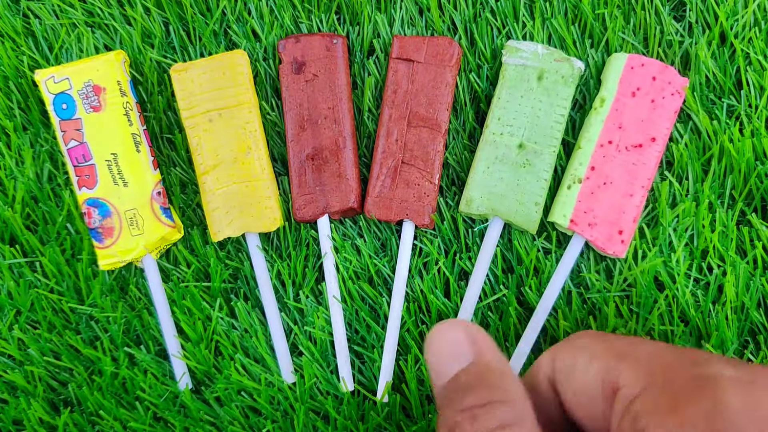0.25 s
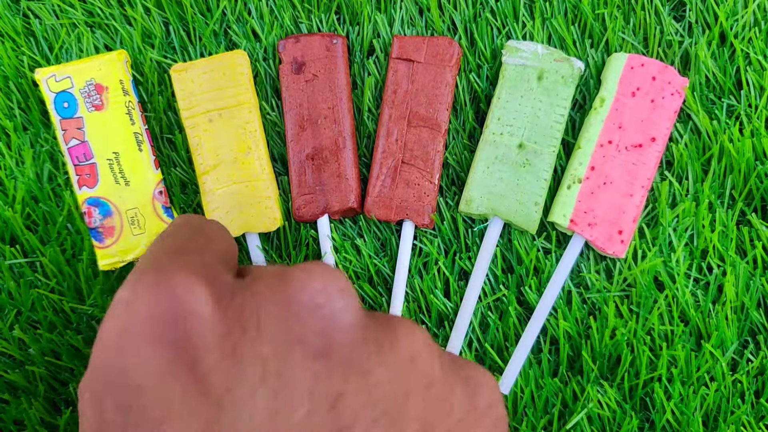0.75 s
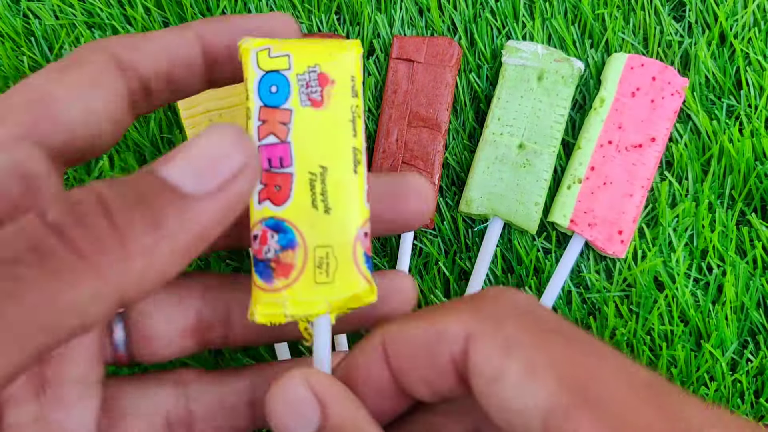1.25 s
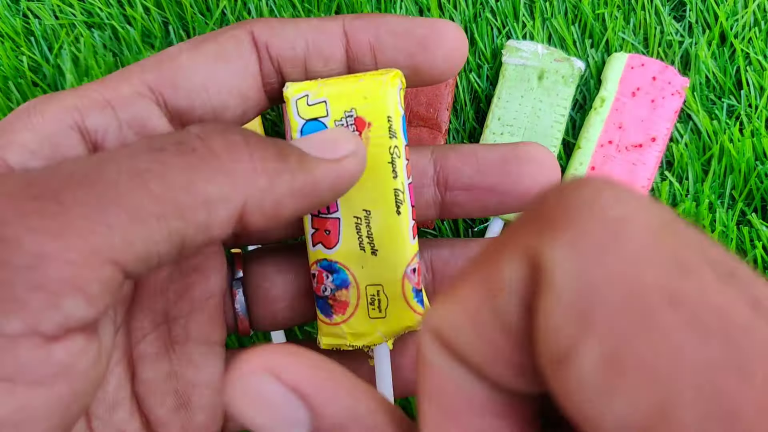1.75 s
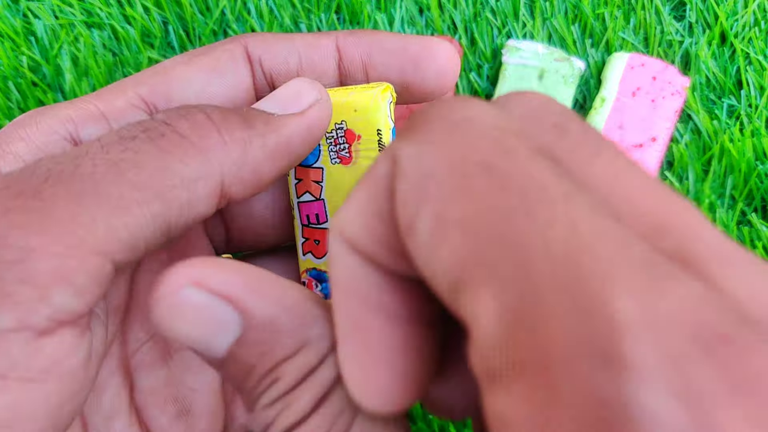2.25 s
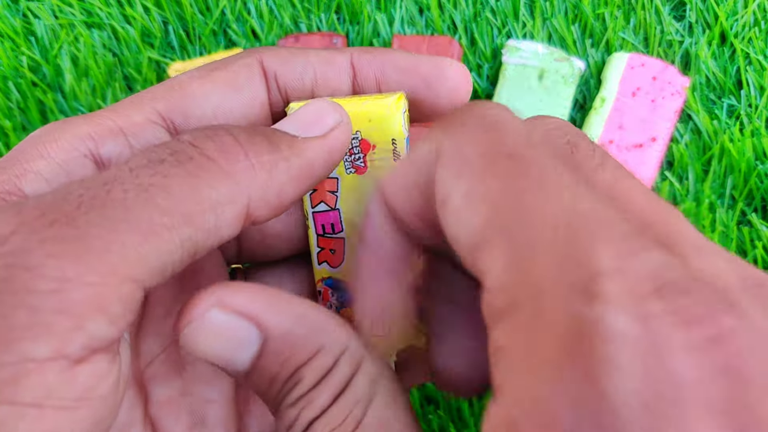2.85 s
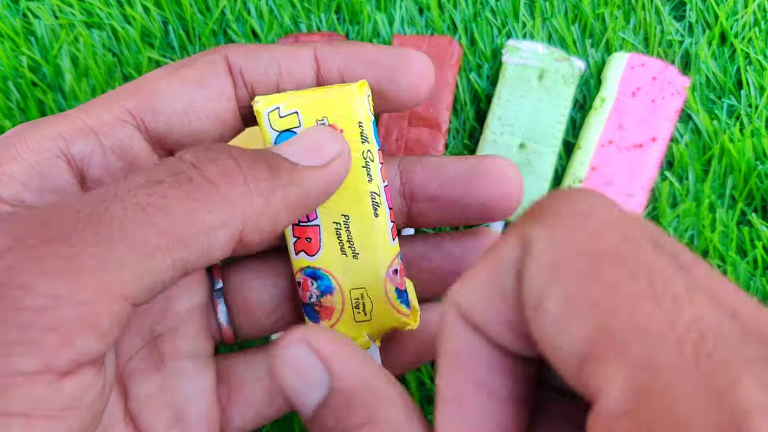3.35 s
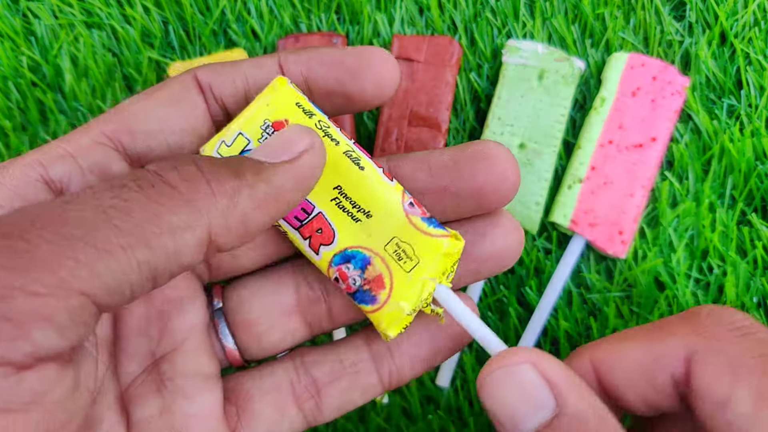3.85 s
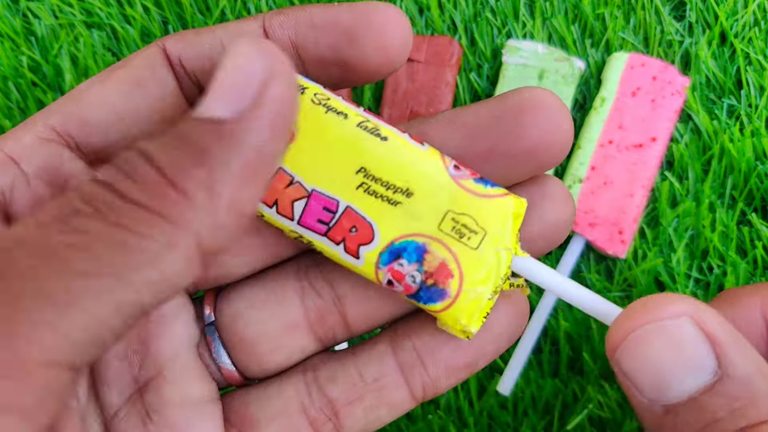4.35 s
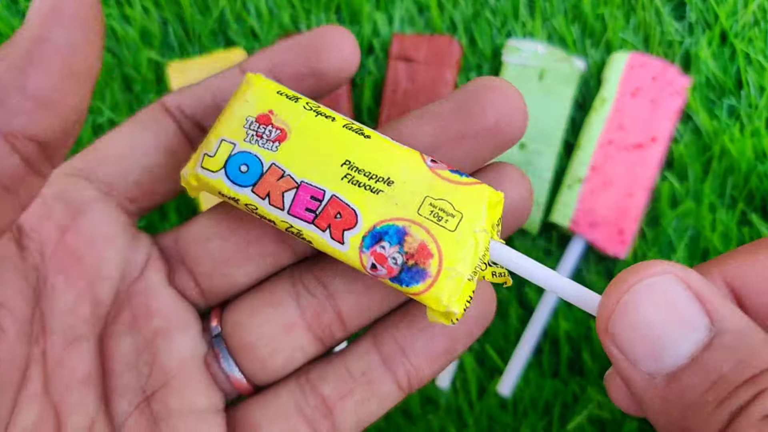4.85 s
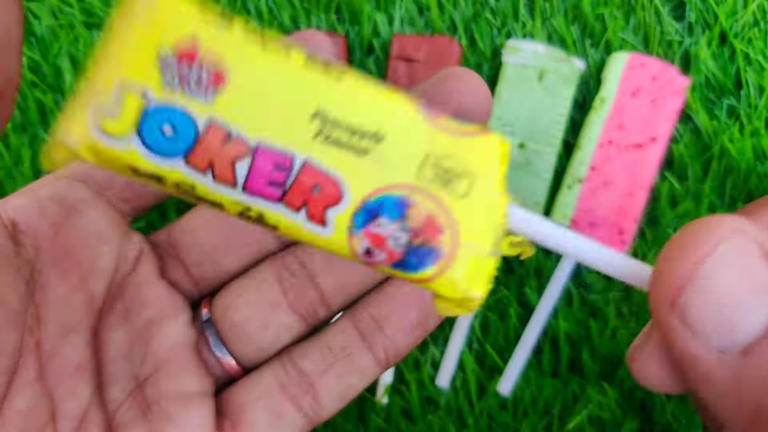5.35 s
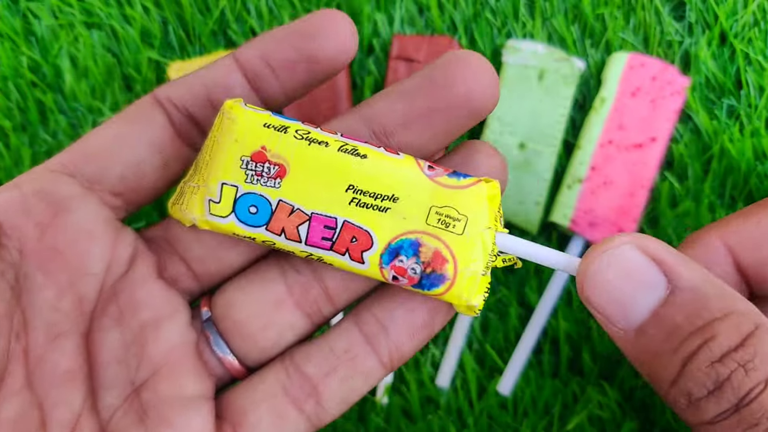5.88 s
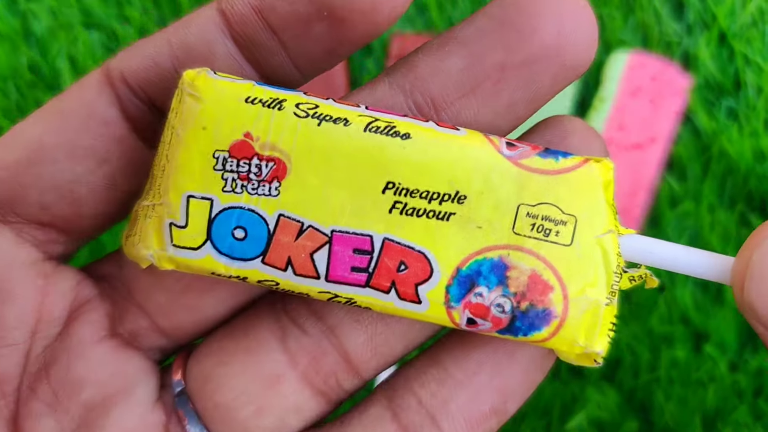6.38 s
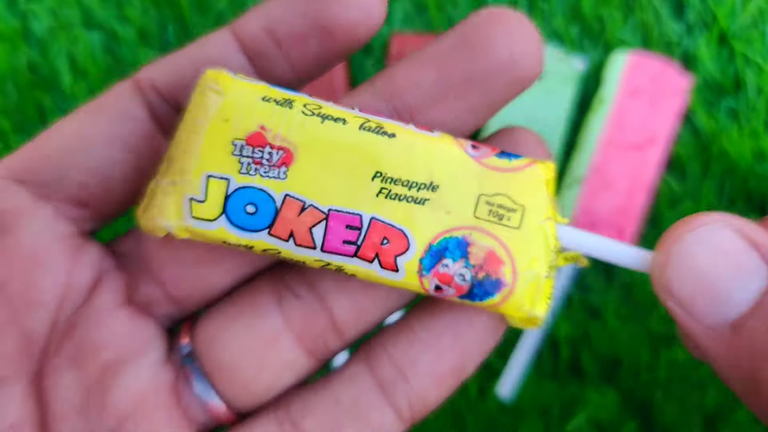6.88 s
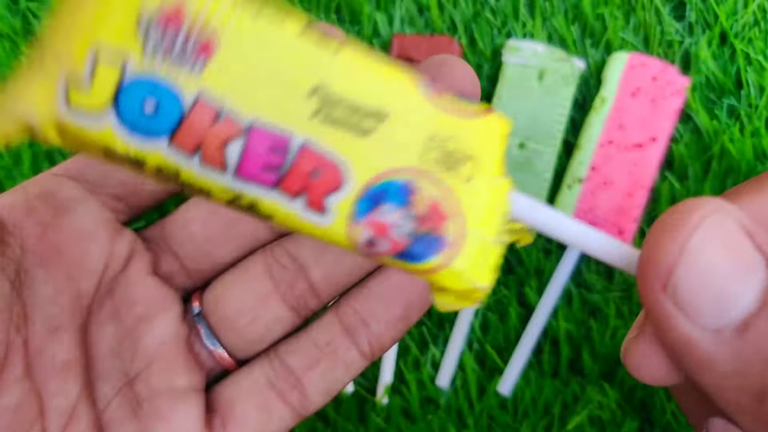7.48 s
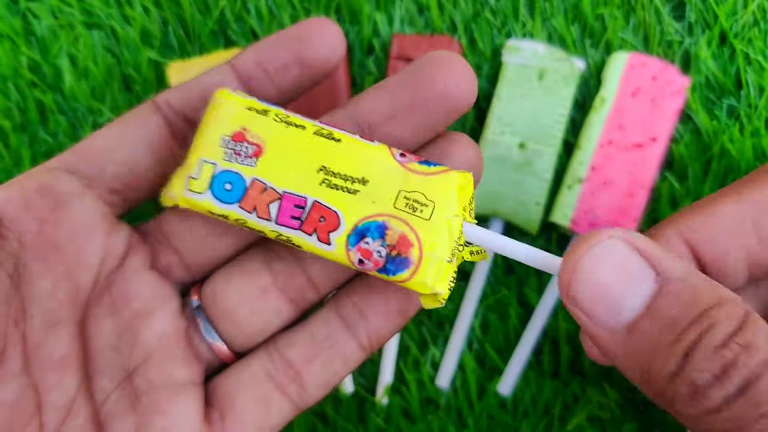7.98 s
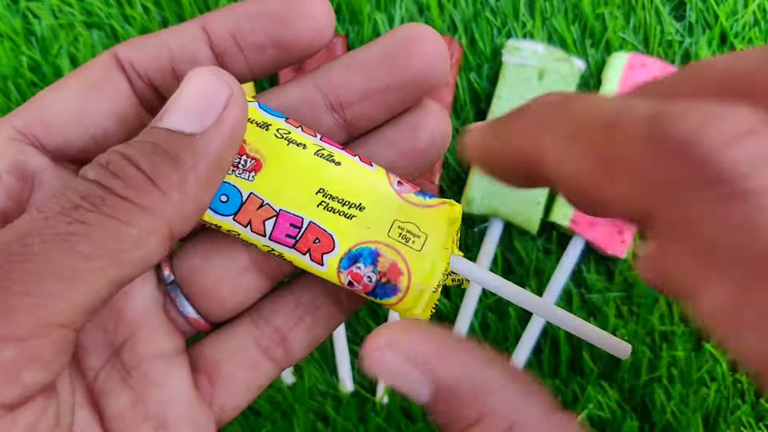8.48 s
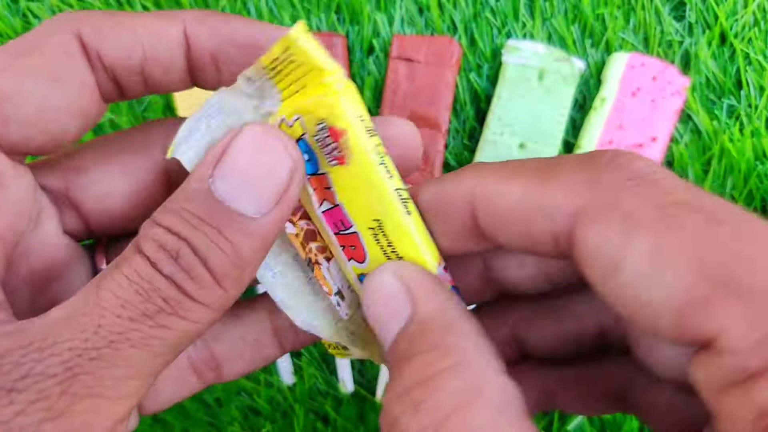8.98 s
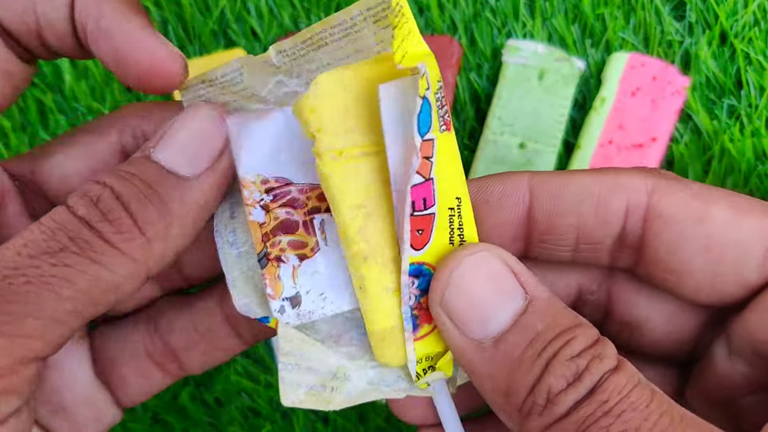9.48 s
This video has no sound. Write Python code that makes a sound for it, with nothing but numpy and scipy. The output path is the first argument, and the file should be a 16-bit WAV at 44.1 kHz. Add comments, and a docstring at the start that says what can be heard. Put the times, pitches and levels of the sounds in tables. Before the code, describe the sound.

A fingernail taps a wrapped lollipop in three short series, then the wrapper crackles and is peeled open, over a faint distant engine throb.

```python
"""Tapped and rubbed sweet wrapper

A fingernail taps a foil-wrapped sweet in three series close to a two-port phone; thumbs rub and peel the wrapper.
Each tap is a few milliseconds of creases snapping at once, as shaped noise; loose creases crackle in between.
Rubbing is uneven filtered grains. A far engine, noisy pulses through room modes, throbs beneath.
Filtered noise makes a faint hiss and a few thin whistles."""
import sys
import numpy as np
from scipy import signal
from scipy.fft import rfft, irfft, next_fast_len
from scipy.io import wavfile
from scipy.ndimage import uniform_filter1d

SR = 44100
rng = np.random.default_rng(int(sys.argv[2]) if len(sys.argv) > 2 else 0)


def wav_record(signal):
    """Record a signal, one row per channel, as 16-bit PCM in the file named by sys.argv[1]."""
    frames = np.transpose(np.atleast_2d(signal))
    bounded = np.clip(frames, -1, 1)
    # unit amplitude maps onto the largest positive 16-bit level
    quanta = np.round(bounded * 32767).astype(np.int16)
    wavfile.write(sys.argv[1], SR, quanta)


N = 429093
TIME = np.arange(N) / SR  # s


def taps():
    """Buckling: creases in the film give way together, hold for a moment and die fast; then the finger peels off."""
    # Nail blows on the film. Each row: time in seconds, ring level in dB, ring pitch in Hz,
    # body level (0.75-1.5 kHz) in dB, edge level (1.5-2.4 kHz) in dB, hold in ms.
    blows = [(2.0269, -13, 2800, -25, -27, 0.94), (2.355, -11, 3070, -25, -27.5, 2.07),
             (2.6412, -12.5, 3800, -21, -18, 1.23), (2.915, -10.5, 3540, -18, -20, 1.35),
             (3.1884, -6, 3210, -17, -19.5, 1.46), (5.064, -21, 3310, -31.5, -27.5, 3.86),
             (5.2865, -24.5, 3420, -33, -27.5, 4.05), (5.491, -18, 4280, -34, -26, 3.24),
             (5.692, -16.5, 4090, -27.5, -25, 3.13), (7.223, -14, 3800, -26.5, -33.5, 3.2),
             (7.4267, -16.5, 4340, -28, -31.5, 3.9), (7.6166, -14.5, 4140, -30.5, -24.5, 3.54),
             (7.8109, -10.5, 4120, -28.5, -24.5, 3), (7.9953, -15.5, 3950, -31.5, -22.5, 3.5),
             (8.1652, -18.5, 2980, -24.5, -26.5, 3.2)]
    s, ring_db, ring_hz, body_db, edge_db, hold_ms = np.transpose(blows)
    hold = hold_ms[:, None]
    same = np.ones(len(s))
    pan_db = -1 * same  # left minus right

    ms = (np.arange(4096) - 512) * 1000 / SR
    after = np.maximum(ms - hold, 0)
    rise_ms = 0.23 + 0.35 * hold
    # the crest lies 0.45 of the way into the hold; 2 dB are lost per ms away from it
    off_crest = np.abs(np.clip(ms, 0, hold) - 0.45 * hold)
    envelope = np.exp(-(np.minimum(ms, 0) / rise_ms) ** 2) * undb(-2 * off_crest)
    envelope *= np.exp(-after / 0.89) + undb(-21) * np.exp(-after / 10.0)

    def air_pocket_db(hz):
        """Resonance: the air pocket under the nail rings at its own pitch."""
        return 9 / (1 + ((hz - ring_hz[:, None]) / 260) ** 2)

    # a longer hold is a softer blow
    knock_db = -15.5 - 6.5 * hold_ms
    sheen_db = -13 - 3 * hold_ms
    treble_db = -19.5 - 1.5 * hold_ms
    thud_db = -33 * same
    edges = [350, 750, 1500, 2400, 4700, 9000]  # Hz
    bands = [thud_db, knock_db, body_db, edge_db, ring_db, sheen_db, treble_db]
    blow = snaps(s, envelope, air_pocket_db, edges, bands, pan_db, apart=0.45)

    # the dented film springs back in a papery, grainy swell
    grain = undb(0.83 * rng.exponential(size=(len(s), 64))).repeat(64, axis=1)
    grain = uniform_filter1d(grain, 32)
    swell = (ms > 0) * grain * np.exp(-((ms - 28) / 26) ** 2)
    bands = [(-53.5 + db) * same for db in (-20.5, -15.0, -1.5, -9.5)]
    lift = snaps(s, swell, lambda hz: 0 * hz[None], [600, 1500, 9000], bands, 0.5 * pan_db, apart=2.8)
    return blow + lift


def crackles():
    """Snap-through: single creases flip in about a millisecond, each with its own pitch and length."""
    # The clearest creases. Each row: time in seconds, level in dB, body minus level in dB,
    # sheen above 4.7 kHz minus the range below it in dB.
    clear_creases = [(1.399, -44, -28, -16), (1.409, -40.5, -36, -21), (1.535, -48.5, -19, -9),
                     (2.053, -52, 2, -9), (2.388, -35.5, -16, -8), (2.665, -55, -16, -12),
                     (2.679, -38, -17, -8), (2.692, -42.5, -5, -17), (2.935, -42, -19, -8),
                     (2.945, -35.5, -15, -4), (2.966, -40, -11, -3.5), (3.207, -46.5, -7.5, 1),
                     (3.226, -34.5, -25, -2), (3.245, -39.5, -21, -10), (3.329, -47.5, -19, -18.5),
                     (3.743, -46, -12.5, -7.5), (4.022, -42.5, -18, -13), (4.106, -33, -39, 6),
                     (4.314, -46, -21, 3), (4.351, -45, -10, -9), (4.385, -42, -9, -9),
                     (4.395, -41, -16, -5), (4.409, -39, -15, -6), (4.438, -49, -13, -18),
                     (4.521, -37.5, -25, -7), (4.942, -42, -8, -8), (5.095, -34, -23.5, -8),
                     (5.314, -40.5, -15, -9), (5.517, -38, -17.5, -6), (5.574, -46.5, -17, -12),
                     (5.713, -41.5, -5, -4.5), (6.863, -52, -8, 0), (7.01, -43, -10, -6.5),
                     (7.097, -42.5, -18.5, -14), (7.159, -46.5, -20, -8), (7.248, -37, -13, -9),
                     (7.305, -46, -11, -7.5), (7.465, -39, -21, -12.5), (7.507, -46, -12, -12),
                     (7.561, -48.5, -17, -8), (7.701, -47, -20, -8), (7.839, -36, -12, -7),
                     (8.023, -37.5, -31, -8), (8.12, -37.5, -16.5, -8), (8.695, -39.5, -5.5, 0),
                     (8.712, -49, -14, 5), (8.752, -39, -23, -21), (8.757, -36, -11, -16),
                     (8.842, -38.5, -29, 2), (8.885, -39.5, -16, -2), (8.953, -42, -15, 1),
                     (9.016, -32.5, -11, 8), (9.023, -26.5, -29, -2.5), (9.093, -25.5, -25, 2),
                     (9.117, -41, -8, -17), (9.127, -33, -21, -14), (9.16, -38, -4.5, -16),
                     (9.36, -42.5, 1.5, -18), (9.376, -33.5, -7, -12), (9.391, -31.5, -6.5, -1),
                     (9.425, -23, -7, -9), (9.433, -26.5, -1, -19), (9.444, -25, -17, -13),
                     (9.452, -31.5, -10, -11), (9.459, -31, -3.5, -14), (9.477, -34.5, -10, -9),
                     (9.544, -19.5, -8, -4), (9.554, -18.5, -5.5, -9.5), (9.608, -32, -5.5, -25),
                     (9.62, -46, -2, -18), (9.662, -32, -7.5, 1)]
    s, db, body, sheen = np.vstack([clear_creases, loose_creases()]).T
    chance = rng.random((len(s), 3))

    ms = (np.arange(1024) - 128) * 1000 / SR
    decay_ms = 0.78 + 0.49 * chance[:, :1]
    envelope = np.exp(np.minimum(ms, 0) / 0.6) * np.exp(-np.maximum(ms, 0) / decay_ms)
    envelope += undb(-12.5) * (ms > 0) * np.exp(-ms / 6)

    def pitch_db(hz):
        """Resonance: each crease favours a range of its own."""
        return 6 / (1 + ((hz - 2800 - 1500 * chance[:, 1:2]) / 500) ** 2)

    body_db = db + body
    treble_db = db - 6 + 0.19 * sheen - 6 * chance[:, 2]
    bands = [body_db - 18.5, body_db, *split(db, sheen), treble_db]
    pan_db = np.full(len(s), -1.5)
    return snaps(s, envelope, pitch_db, [500, 1500, 4700, 8000], bands, pan_db, apart=0.98)


def loose_creases():
    """Poisson process: small creases at chance moments, their level following the rub that frees them."""
    rate_per_s, over_rub_db, spread_db = 18, 9, 3
    chance = rng.random((400, 4))
    s = 0.022 + np.cumsum(-np.log(1 - chance[:, 0])) / rate_per_s
    inside = s < N / SR
    chance, s = chance[inside], s[inside]
    rub_db = rubbing()[0][(s * SR).astype(int)]
    db = rub_db + over_rub_db - spread_db * np.log(1 - chance[:, 1])
    body = -18 * chance[:, 2]
    sheen = 1.5 - 18 * chance[:, 3]
    return np.transpose([s, db, body, sheen])


def snaps(s, envelope, colour_db, edges, band_db, pan_db, apart):
    """Shot noise: bursts of tiny snaps under an envelope reach both ports; band_db sets each band's strength."""
    size = envelope.shape[1]
    hz = np.arange(size // 2 + 1) * SR / size
    chance = rng.standard_normal((len(s), 3, size))
    # both ports hear the same creases, plus some, mostly fine ones, that face only one of them
    push = rfft(chance * envelope[:, None])
    heard = push[:, :1] + apart * (0.32 + hz / 9000) * push[:, 1:]
    tone = heard * causal(port_db(hz) + colour_db(hz)[:, None])

    # bring each band to its level, then tilt the balance between the ports
    band = np.searchsorted(edges, hz)
    power = np.array([np.sum(np.abs(tone[..., band == k]) ** 2, axis=2) for k in range(len(edges) + 1)])
    wanted_db = np.array(band_db) + 10 * np.log10(np.sum(envelope ** 2, axis=1) * size / 4)
    gain_db = (wanted_db - 10 * np.log10(power.mean(axis=2)))[..., None]
    gain_db = gain_db + pan_db[:, None] * np.array([0.5, -0.5])
    smooth_db = uniform_filter1d(np.moveaxis(gain_db[band], 0, -1), size // 300)
    tone *= causal(smooth_db)

    out = np.zeros((2, N + size))
    for t, burst in zip(s, irfft(tone)):
        at = int(t * SR) - size // 8  # the envelope's zero time lies an eighth in
        out[:, at:at + size] += burst
    out[1] = np.roll(out[1], 5)  # the right port hears it 5 samples later
    return out[:, :N]


def port_db(hz):
    """Diffraction and resonance: how each port hears the film, in dB."""
    # Response of the two ports. Each row: frequency in Hz, left gain in dB, right gain in dB.
    port_response = [(159.7, -7, -15.5), (600, 6.5, -0.5), (1190, 16, 11), (1485, 11, 2), (2110, 14.5, 9.5),
                     (2800, 11.5, 5.5), (3200, 10, 5.5), (3667, 16.5, 7), (5330, 1.5, 5.5),
                     (5160, -7.5, 10.5), (5900, -6.5, 10), (6880, -6, 8), (8400, -2.5, -9.5),
                     (11630, 2, -3), (15600, 7.5, 8.5), (17500, -31, -27)]
    points, left, right = np.transpose(port_response)
    return np.array([on_log(hz, points, left), on_log(hz, points, right)])


def rustle():
    """Friction: uneven grains of skin on film, unrelated at the two ports; each range comes in its own fits."""
    db, body_db, sheen_db = rubbing()
    # now and then a grain catches and stands out, more so the harder the film is worked
    grip = np.clip(1.9 + (db + 62) / 8, 1.7, 3.4)
    catch = rng.exponential(size=(3, 1, N // 48 + 1)).repeat(48, axis=2)[..., :N]
    catches = undb(grip * (catch - 1.2))
    fits = undb([[1.4 * walk(60)] for _ in range(3)])
    grains = rng.standard_normal((3, 2, N)) * catches * fits

    def film(hz):
        # coloured by the ports; coarse and fine grains have no sound above 15.9 kHz
        return undb(0.59 * port_db(hz)) * (hz < 15900)

    def highpass(hz, corner_hz, order):
        return 1 / (1 + (corner_hz / np.maximum(hz, 1)) ** order)

    def coarse_gain(hz):
        ring = undb(2.5 / (1 + ((hz - 3650) / 390) ** 2))  # the rubbed film favours one range
        return ring * film(hz) * highpass(hz, 1700, 6) / (1 + (hz / 4800) ** 8)

    def fine_gain(hz):
        slope = (0.66 + 1 / (1 + (hz / 7500) ** 8)) / (0.8 + hz / 12000)
        return film(hz) * highpass(hz, 4800, 8) * slope

    coarse = unit(shaped(grains[0], coarse_gain))
    fine = unit(shaped(grains[1], fine_gain))
    body = unit(shaped(grains[2], lambda hz: 1 / (1 + ((hz - 1100) / 500) ** 2)))
    return undb(db) * (coarse + undb(sheen_db) * fine + undb(body_db) * body)


def rubbing():
    """Power addition: strokes swell, hold and fade; returns the level and the shares of body and sheen, in dB."""
    # Strokes of skin on the film. Each row: start in seconds, length in seconds, level in dB,
    # body minus level in dB, sheen minus level in dB.
    strokes = [(0, 0.25, -73.5, 3.5, -9), (0.663, 0.095, -70, 6, -4.5), (0.808, .13, -70, 2.5, 2),
               (1.403, 0.013, -62, -14, -7), (1.44, 0.02, -66.5, -17, -15), (1.527, 0.034, -69.5, -12, 1.5),
               (1.658, 0.013, -73.5, 0, 8), (3.647, .12, -63.5, -17, 0), (3.77, 0.15, -68.5, -18, 0.5),
               (3.972, 0.097, -62, -21, -5), (4.125, .11, -69.5, -11, -4.5), (4.291, 0.051, -62, -13, 1.5),
               (4.376, 0.089, -61, -23, -3), (4.746, 0.1, -71, -14, -1.5), (4.911, 0.016, -63, -7, -6.5),
               (5.347, 0.024, -65, -15, -7.5), (5.503, 0.19, -72.5, -4, -6),
               (5.961, .06, -74.5, -4.5, -1.5), (6.65, 0.28, -70, 3.5, -13), (7.06, 0.036, -64.5, -8, -4),
               (7.233, 0.068, -61.5, -11, -7), (7.349, 0.035, -67, -5.5, -4), (7.433, 0.067, -63.5, -4, -7),
               (7.628, 0.11, -66.5, -4, -9), (7.81, 0.27, -65.5, -3.5, -5.5), (8.481, 0.045, -65, -8, -2),
               (8.586, 0.054, -60.5, -12, -5.5), (8.704, 0.15, -59, -14, -3), (8.91, 0.043, -61, -3.5, -4),
               (8.984, 0.051, -55, -12, -2), (9.091, 0.067, -53.5, -2.5, -4.5),
               (9.21, 0.17, -65.5, -1, -10), (9.386, 0.12, -60, -4, -6), (9.54, 0.023, -53.5, -1, -8),
               (9.594, 0.16, -57, -2, -4.5)]
    attack_s, release_s = 0.011, 0.0083

    def powers(db, body_db, sheen_db):
        return undb(2 * (db + np.array([[0], [body_db], [sheen_db]])))

    power = powers(-76, -5, -3.5)  # the wrapper resting in the hand
    for s, length, *levels in strokes:
        before = np.minimum(TIME - s, 0)
        after = np.maximum(TIME - s - length, 0)
        power = power + powers(*levels) * np.exp(before / attack_s - after / release_s)
    db = 10 * np.log10(power)
    return db[0], db[1] - db[0], db[2] - db[0]


def engine():
    """Modal excitation: uneven firings and noise drive the room modes, which lie differently at the two ports."""
    # Course of the engine. Each row: time in seconds, throb of the low modes in dB,
    # drone of the upper modes in dB.
    engine_course = [(0.0, -44.5, -52), (0.8, -55, -59.5), (1.02, -53, -59.5), (2.32, -65, -53),
                     (4.5, -56.5, -58), (4.7, -63.5, -59), (5.78, -50, -53), (6.28, -49, -54),
                     (6.48, -40.5, -49), (6.86, -50.5, -53.5), (7.06, -42, -49.5), (7.67, -44, -50.5),
                     (7.9, -38.5, -45), (8.16, -45, -50.5), (8.4, -43, -48.5), (8.71, -53, -51.5),
                     (8.95, -38, -51), (9.27, -52.5, -50.5), (9.48, -42, -51.5), (9.72, -50.5, -47.5)]
    # Room modes. Each row: frequency in Hz, width in Hz, level in dB, left minus right in dB.
    low_modes = [(34.7, 31, -9.5, -9), (69.3, 17.7, -6.5, -19.5)]
    upper_modes = [(115, 31, -3, -9), (130.7, 42, 1.5, 0), (166.8, 75, 1.5, -0.5), (200.4, 9, 3, 5),
                   (214, 5.8, -4.5, -4.5), (268, 190, -14, 1)]
    s, throb_points, drone_points = np.transpose(engine_course)
    throb_db = np.interp(TIME, s, throb_points)
    drone_db = np.interp(TIME, s, drone_points)

    firing_hz = 35.2 * (1 + 0.021 * walk(3))
    cycle = np.cumsum(firing_hz) / SR
    firing = np.diff(np.floor(cycle), prepend=0) * undb(2.7 * walk(30))
    shared_noise = 1.5 * rng.standard_normal(N)
    own_noise = 0.9 * rng.standard_normal((2, N))
    drive = 0.85 * unit(firing) + shared_noise + own_noise

    def room(modes):
        """Superposition: the modes add up as complex resonances."""
        def gain(hz):
            total = 0
            for f, width, db, pan in modes:
                level = undb(db + np.array([[pan], [-pan]]) / 2)
                resonance = 1 / (1 + 2j * (hz - f) / width)
                skirt = 1 / (1 + ((hz - f) / width) ** 2 / 4)
                total = total + level * resonance * skirt
            return total
        return unit(shaped(drive, gain))

    return undb(throb_db) * room(low_modes) + undb(drone_db) * room(upper_modes)


def whistles():
    """Narrow-band noise: thin, breathy tones that swell and fade."""
    # Faint whistles. Each row: start in seconds, length in seconds, pitch in Hz, level in dB.
    thin_tones = [(.02, 0.074, 3790, -78), (0.412, .09, 3750, -72), (.97, .07, 3680, -77),
                  (6.17, 0.14, 2173, -74.5), (6.4, .1, 2190, -78.5)]
    width_hz = 40
    out = 0
    for s, length, pitch_hz, db in thin_tones:
        tone = shaped(rng.standard_normal(N), lambda hz: 1 / (1 + (2 * (hz - pitch_hz) / width_hz) ** 2))
        swell = np.sin(np.pi * np.clip((TIME - s) / length, 0, 1))
        out = out + undb(db) * unit(tone) * swell
    return out


def hiss():
    """Partial coherence: a building rumble shared by both ports, plus the self-noise of each."""
    # Spectrum of the background. Each row: frequency in Hz, relative spectral level in dB.
    hiss_spectrum = [(25, -1.5), (50, 0), (90, -14), (130, -13), (212, -14.5), (240, -29.5), (400, -28.5),
                     (520, -29), (1000, -34.5), (2500, -39), (4000, -44), (5000, -54.5), (9000, -47.5),
                     (12500, -42.5), (15700, -39.5), (16100, -80.5)]
    points, db = np.transpose(hiss_spectrum)

    def colour(hz):
        return undb(on_log(hz, points, db))

    def rumble(hz):
        return 1.2 * colour(hz) / (1 + (np.log(np.maximum(hz, 1) / 170) / 0.77) ** 4)

    own = shaped(rng.standard_normal((2, N)), colour)
    shared = shaped(rng.standard_normal(N), rumble)
    return undb(-51.5 + 0.72 * walk(0.93)) * unit(own + shared)


def undb(db):
    """Decibel law: amplitude for a level in dB."""
    return 10 ** (np.asarray(db) / 20)


def unit(x):
    """Normalisation: scale to an RMS of 1."""
    return x / np.sqrt(np.mean(x ** 2))


def split(db, upper_db):
    """Power sharing: divide a level between a lower and an upper range that differ by upper_db."""
    lower = db - 10 * np.log10(1 + 10 ** (upper_db / 10))
    return [lower, lower + upper_db]


def on_log(hz, points, values):
    """Logarithmic frequency scale: interpolate values between points in Hz."""
    return np.interp(np.log(np.maximum(hz, 1)), np.log(points), values)


def causal(db):
    """Minimum phase: the causal response for a gain in dB, by folding its cepstrum."""
    c = irfft(db * np.log(10) / 20)
    half = c.shape[-1] // 2
    c[..., 1:half] *= 2
    c[..., half + 1:] = 0
    return np.exp(rfft(c))


def shaped(x, gain):
    """Linear filtering: multiply the spectrum by a gain given as a function of frequency."""
    size = next_fast_len(N)
    hz = np.arange(size // 2 + 1) * SR / size
    return irfft(rfft(x, size) * gain(hz), size)[..., :N]


def walk(rate):
    """Smoothed random process: chance levels held 1 / rate s and slewed twice."""
    k = int(SR / rate)
    held = np.repeat(rng.standard_normal(N // k + 1), k)
    return 1.3 * uniform_filter1d(uniform_filter1d(held, k), k)[:N]


def scene():
    """Superposition: all sources add at the two ports."""
    return taps() + crackles() + rustle() + engine() + hiss() + whistles()


def record(dry):
    """Saturation and band limiting: the loudest peaks are rounded; nothing sounds above about 16.7 kHz."""
    rounded = np.tanh(0.92 * dry) / 0.86
    lowpass = signal.ellip(10, 0.2, 80, 16700, fs=SR, output="sos")  # order, ripple dB, stop dB, edge Hz
    return signal.sosfilt(lowpass, rounded)


dry = scene()
out = record(dry)
wav_record(out)
```